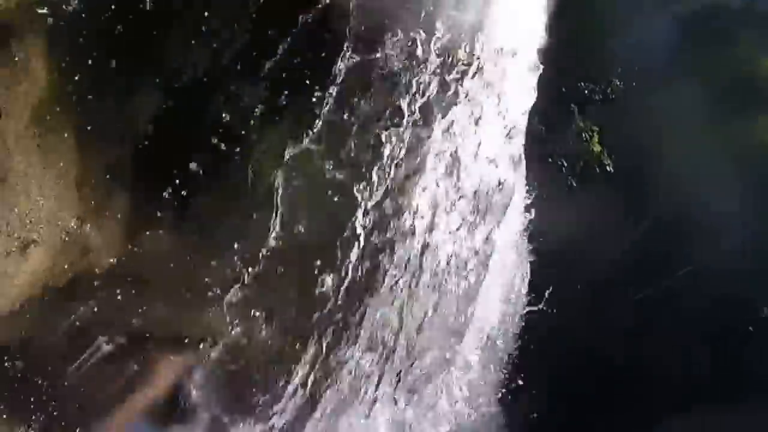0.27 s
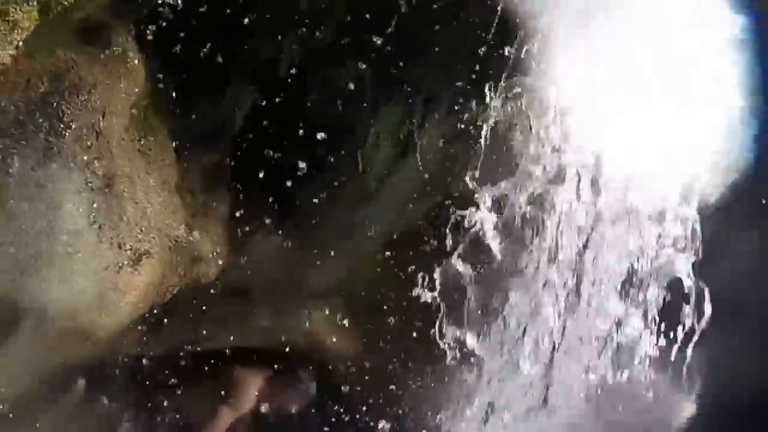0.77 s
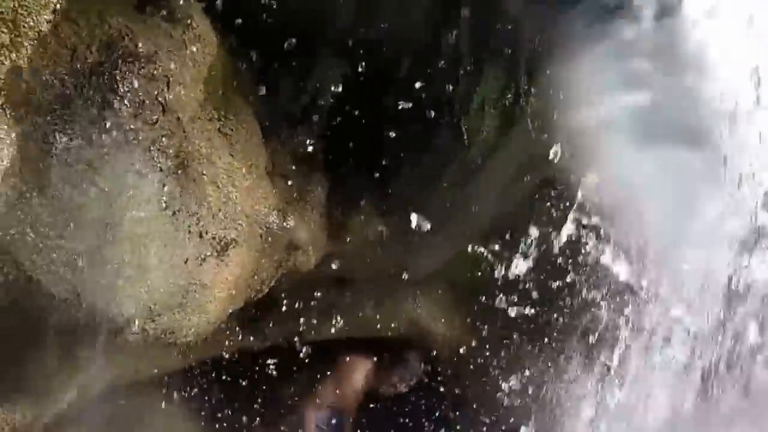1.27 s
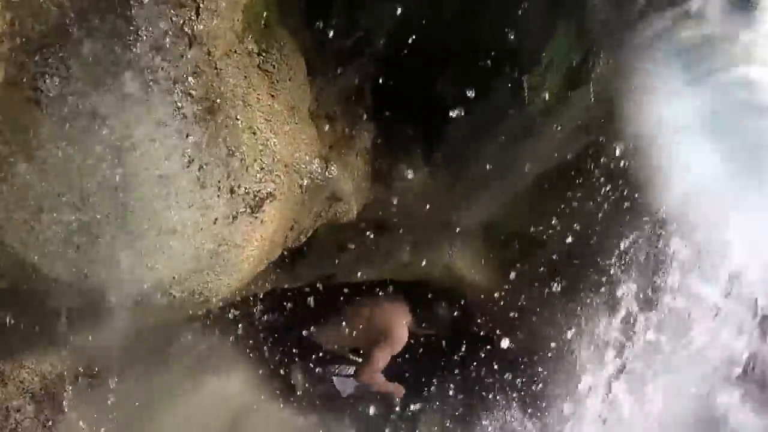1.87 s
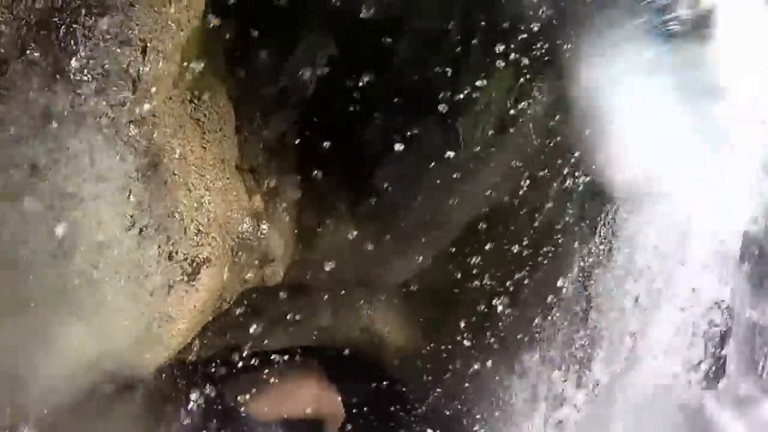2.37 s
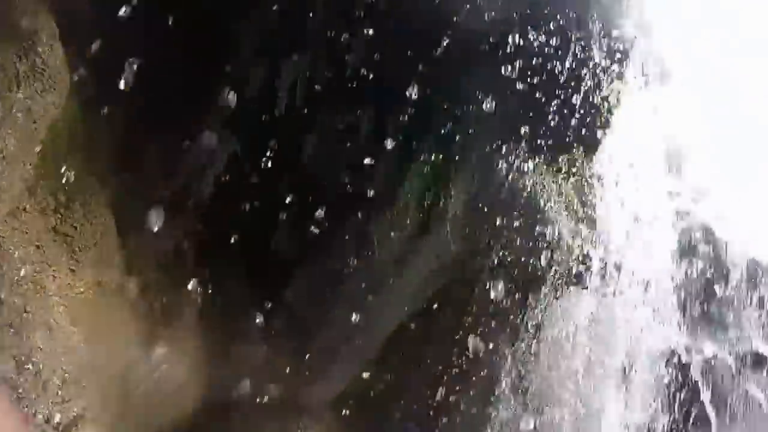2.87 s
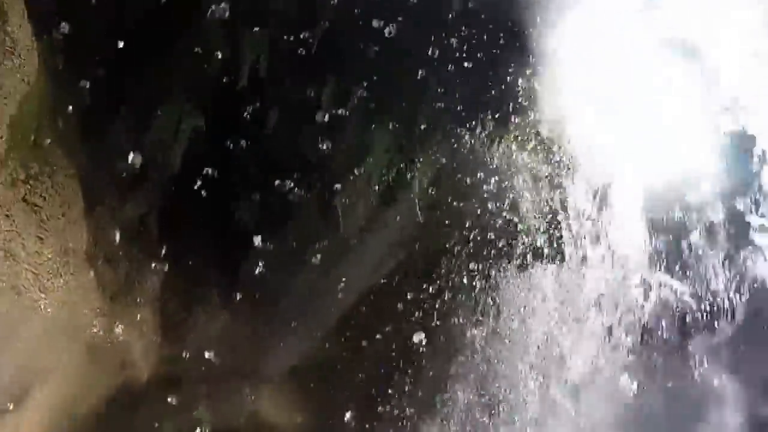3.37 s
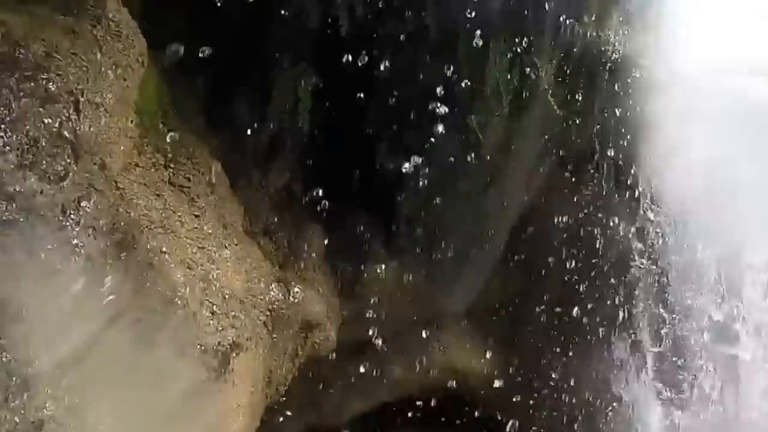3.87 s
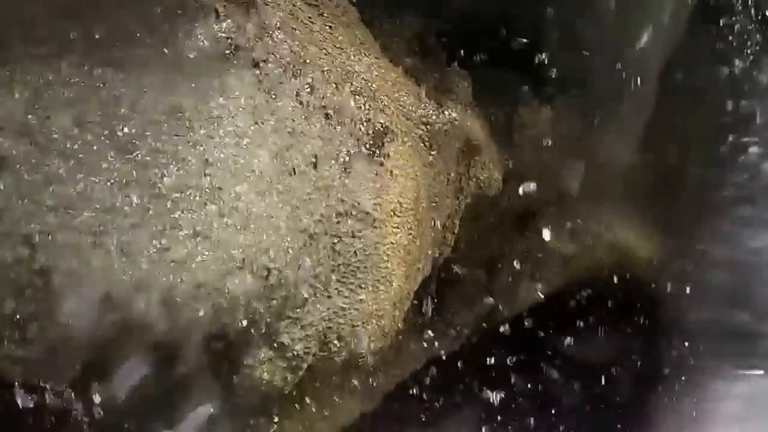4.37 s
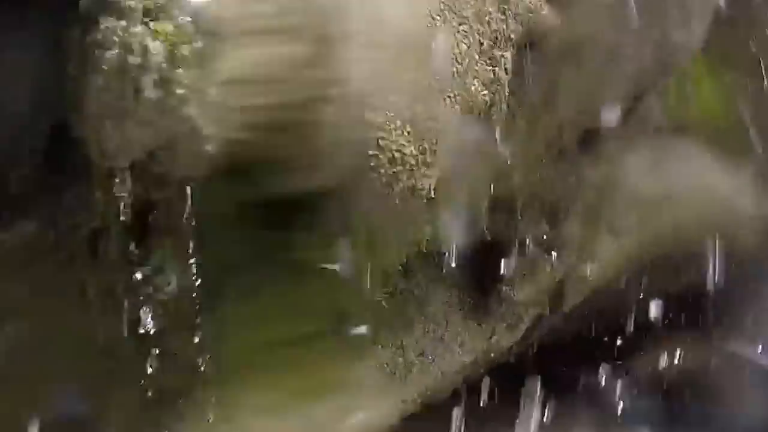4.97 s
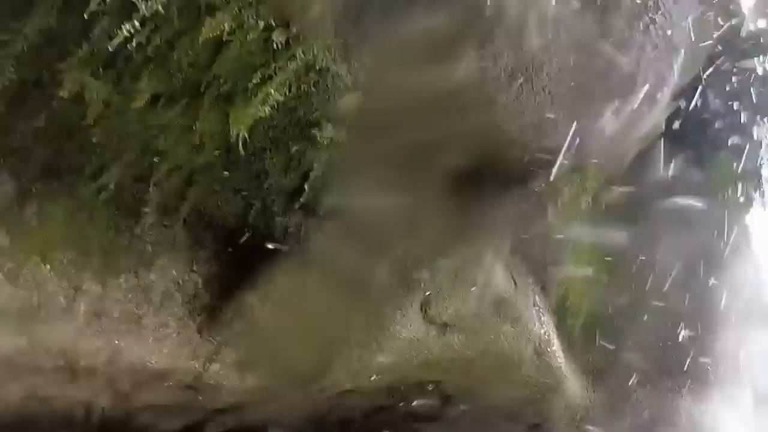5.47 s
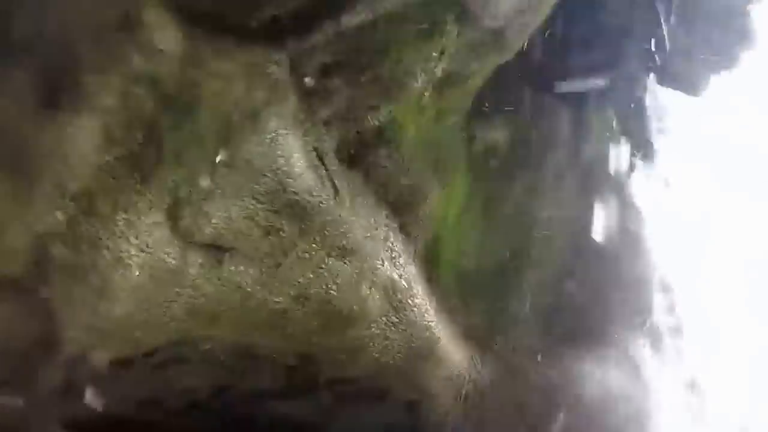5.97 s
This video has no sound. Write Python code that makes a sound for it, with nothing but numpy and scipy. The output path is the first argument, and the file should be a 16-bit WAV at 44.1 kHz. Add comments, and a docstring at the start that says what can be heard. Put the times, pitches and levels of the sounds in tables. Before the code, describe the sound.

A waterfall rushes and hisses close by while a hand bumps and knocks the wet microphone housing, then heavy drops smack it with splashes.

```python
"""A waterfall pours close by throughout, its patchy rush and fine spray made of flickering noise.
A soft bump comes first, the colour turns at 0.7 s, and a lone drop smacks the wet housing at 1 s.
From 2.5 s a cupping hand bumps and knocks the housing: damped swings, squelches and short rings.
The hand leaves at 4 s; drops smack the housing with rings, splash and low thumps; water spits at the port.
The microphone port colours everything; a limiter ducks the sound at its highest peaks."""
import sys
import numpy as np
from scipy import signal
from scipy.fft import rfft, irfft
from scipy.io import wavfile
from scipy.ndimage import uniform_filter1d, minimum_filter1d

SR = 44100
rng = np.random.default_rng(int(sys.argv[2]) if len(sys.argv) > 2 else 0)


def master(y):
    """Save y as 16-bit WAV."""
    cut = np.clip(np.atleast_2d(y).T, -1, 1)
    pcm = np.round(cut * 32767)  # scale
    wavfile.write(sys.argv[1], SR, pcm.astype(np.int16))


N = 274302
TIME = np.arange(N) / SR
EDGE_HZ = 15450  # upper band limit


def gain_of(db):
    """Decibels to amplitude."""
    return 10 ** (np.asarray(db) / 20)


def evened(x):
    """Scales to rms 1."""
    return x / np.sqrt(np.mean(x ** 2) + 1e-20)


def read(points, hz):
    """Reads a spectrum in dB, its points joined on a log-frequency axis."""
    point_hz, db = np.transpose(points)
    return np.interp(np.log(hz + 1), np.log(point_hz), db)


def levels(rows):
    """One gain curve over time for each dB column of a table."""
    s, *columns = np.transpose(rows)
    return [gain_of(np.interp(TIME, s, column)) for column in columns]


def add(mix, s, sound):
    """Mixes a sound in at time s."""
    part = mix[round(s * SR):][:len(sound)]
    part += sound[:len(part)]


def shaped(x, points):
    """Weights a sound by the given spectrum and scales it to rms 1."""
    hz = np.fft.rfftfreq(len(x), 1 / SR)
    spectrum = rfft(x) * gain_of(read(points, hz))
    return evened(irfft(spectrum, len(x)))


def noise(points, size):
    """Noise of rms 1 with the given spectrum."""
    return shaped(rng.standard_normal(size), points)


def ring(t, hz, cycles, onset):
    """A dying oscillation of peak 1; decay and onset are counted in cycles."""
    turns = hz * t
    envelope = np.exp(-turns / cycles) * (1 - np.exp(-turns / onset))
    wave = np.sin(2 * np.pi * turns) * envelope
    return wave / abs(wave).max()


def boost(x, hz, width, db):
    """A resonance rings on top of the sound, or is taken out of it where db is negative."""
    resonance = signal.lfilter(*signal.iirpeak(hz, hz / width, SR), x)
    return x + (gain_of(db) - 1) * resonance


def grains(per_s, low_hz, high_hz, cycles, spread_db, glide, count=30):
    """Many small rings at random times share a set of pitches, a few much larger than the rest."""
    t, out = np.arange(2048) / SR, np.zeros(N)
    for hz in np.geomspace(low_hz, high_hz, count):
        sizes = gain_of(spread_db * np.minimum(rng.exponential(1, N), 4))
        hits = sizes * (rng.random(N) < per_s / count / SR)
        rising_hz = hz * (1 + glide * t)  # the pitch bends upward unless glide is 0
        out += signal.oaconvolve(hits, ring(t, rising_hz, cycles, 0.3))[:N]
    return evened(out)


# relative spectrum of falling water: [pitch_hz, density_db per Hz]
RUSH_SPECTRUM = [(20, -22), (200, -0.1), (500, -1), (950, -3), (1300, 4), (2500, 5.5), (3200, 0.84),
                 (5500, -1.8), (8000, -7), (11000, -15), (13500, -13.5), (15200, -20.5)]
# strength of the fall as the microphone housing turns, before layer trims: [time_s, rush_db, spray_db]
FALL_LEVELS = [(0, -34, -44), (.65, -33.5, -42), (1.2, -33, -40.3), (2.25, -33, -41), (3.4, -32.5, -42),
               (4.15, -33, -41), (4.7, -31.5, -40), (5.15, -32.5, -40.5), (5.6, -31.5, -40.5),
               (6.2, -30.5, -38)]


def waterfall(patch_db=0.86, flicker_db=0.58, swell_db=0.34, split_hz=6500,
              rush_db=-2.5, spray_db=-0.46, fizz_db=-13):
    """Sheets of water break on rock: a patchy rush, finer spray above it and the fizz of near droplets."""
    frames, hz = N // 128 + 5, np.fft.rfftfreq(512, 1 / SR)
    real, imag, patches = rng.standard_normal((3, frames, len(hz)))
    # patches spread over time and pitch; flicker and swell move all pitches together
    patches = uniform_filter1d(patches, size=12, axis=0)
    patches = evened(uniform_filter1d(patches, size=9, axis=1))
    flicker = evened(uniform_filter1d(rng.standard_normal(frames), size=3))
    swell = evened(uniform_filter1d(rng.standard_normal(frames), size=22))
    movement_db = flicker_db * flicker + swell_db * swell
    field_db = read(RUSH_SPECTRUM, hz) + patch_db * patches + movement_db[:, None]
    field = (real + 1j * imag) * gain_of(field_db)

    def layer(share):
        """Turns a share of the moving spectrum back into sound of rms 1."""
        return evened(signal.istft((field * share).T, nperseg=512, noverlap=384)[1][:N])

    fine = 1 / (1 + (split_hz / (hz + 1)) ** 6)
    rush, spray = layer(1 - fine), layer(fine)
    fizz = grains(per_s=1400, low_hz=1430, high_hz=11840, cycles=1.9, spread_db=2.5, glide=2)
    rush_level, spray_level = levels(FALL_LEVELS)
    body = rush_level * (gain_of(rush_db) * rush + gain_of(fizz_db) * fizz)
    return body + spray_level * gain_of(spray_db) * spray


# relative spectrum of a drop bursting: [pitch_hz, density_db per Hz]
SPLASH_SPECTRUM = [(20, -2), (300, -2), (650, 14), (3000, 5.5), (6000, -0.5), (10000, 8), (16000, -47)]
SPLASH_REACH = 2.5  # splash low-pass as a multiple of the pitch: sharper blows splash brighter


def blows(rows, cycles, splash_s, tail_db, wall_db, tail_s=0.0069,
          wall_hz=600, wall_cycles=3.0, level_db=-1):
    """Each blow gives a very short ring, a burst of splash with a wet tail and a nudge to the housing wall."""
    t, out = np.arange(1500) / SR, np.zeros(N)
    wall = gain_of(wall_db) * ring(t, wall_hz, wall_cycles, onset=.2)
    fade = np.exp(-t / splash_s) + gain_of(tail_db) * np.exp(-t / tail_s)
    for s, db, hz, splash_db in rows:
        soften = signal.butter(2, min(SPLASH_REACH * hz, EDGE_HZ), fs=SR)
        burst = evened(signal.lfilter(*soften, noise(SPLASH_SPECTRUM, len(t))))
        splash = 0.34 * np.tanh(burst) * fade  # tanh rounds off the peaks
        blow = gain_of(splash_db) * splash - ring(t, hz, cycles, onset=0.054) - wall
        add(out, s, gain_of(db + level_db) * blow)
    return out


# fingers on the housing, before the trim in blows; splash_db sets the splash against the ring:
# [start_s, level_db, pitch_hz, splash_db]
FINGER_KNOCKS = [(3.0355, -17.5, 535, -12), (3.2267, -17, 700, -9), (3.464, -24, 603, 5),
                 (3.4895, -7, 1375, 10), (3.4909, 5.5, 540, -5), (3.620, -19, 1000, -1),
                 (3.7945, -15.5, 1370, -14)]


def finger_knocks():
    """Fingers knock on the housing, whose ring dies away in about a cycle."""
    return blows(FINGER_KNOCKS, cycles=1.1, splash_s=0.0011, tail_db=-12.5, wall_db=-13)


# the largest drops on the housing, before the trim in blows; splash_db sets the splash against the ring:
# [start_s, level_db, pitch_hz, splash_db]
DROP_SMACKS = [(1.000, -13.5, 2670, -10), (4.753, -10, 2330, -10), (4.9787, -9.5, 1440, 6),
               (4.988, -14, 1510, 9.5), (5.004, -4.5, 2100, 3), (5.1917, -14.5, 1690, -13),
               (5.2124, 8.5, 1470, 1.5), (5.244, -8.5, 1700, 7), (5.362, -6, 1510, -3),
               (5.3788, 6, 2660, 1.5), (5.446, -10, 1470, 3), (5.4518, -3.5, 600, 3), (5.491, -13, 1100, 4),
               (5.583, 0.5, 2070, -7), (5.6494, 3.5, 2150, 2), (5.663, -7.5, 1380, -4),
               (5.827, -16, 1380, 1), (6.1513, -5, 1360, 0.5), (6.1536, -8, 840, -4)]


def drop_smacks():
    """Large drops smack the housing, with a longer splash and less wall than the fingers."""
    return blows(DROP_SMACKS, cycles=1.06, splash_s=.0018, tail_db=-14, wall_db=-26)


# relative spectrum of a squelching water film: [pitch_hz, density_db per Hz]
SQUELCH_SPECTRUM = [(20, -9), (200, 7), (550, 0), (1000, -5.5), (1800, -14), (4000, -35), (15000, -59)]
# the strongest soft bumps of the housing, from the hand and, later, as the low thump under drops:
# [start_s, level_db, pitch_hz, squelch_db]
SOFT_BUMPS = [(.385, -28.5, 67, -57), (2.44, -10.5, 50.7, -30.5), (2.673, -18.5, 75, -52),
              (2.871, -12, 50, -50), (2.894, -15, 55, -42), (2.916, -8, 66, -46), (3.033, -14, 135, -35),
              (3.118, -13.5, 72, -48), (3.15, -12.5, 108, -50), (3.185, -7.5, 118, -27.5),
              (3.194, -7.5, 82.6, -43), (3.233, -19, 89, -23), (3.34, -11.5, 148, -49),
              (3.606, -5, 52, -26), (3.621, -19, 108, -14.5), (3.641, -6.5, 145, -16),
              (3.754, -13.5, 217, -20), (3.796, 0, 56.4, -21.5), (3.847, -11.5, 205, -25),
              (3.883, -9, 111, -21.5), (3.9, -10, 62, -43), (3.984, -21.5, 220, -21.5),
              (4.341, -27, 119, -33.5), (4.68, -27, 97, -39), (5.376, -21, 133, -33),
              (5.552, -22, 130, -26), (6.049, -20.5, 197, -31), (6.150, -15, 198, -27)]


def soft_bumps(cycles=0.41, onset=0.57, squelch_s=0.013, slips_per_s=550):
    """A push or drop gives a heavily damped swing of the housing; its water film squelches in tiny slips."""
    t, out = np.arange(6000) / SR, np.zeros(N)
    envelope = np.exp(-t / squelch_s) * (1 - np.exp(-t / 0.0004))
    for s, db, hz, squelch_db in SOFT_BUMPS:
        slipping = (rng.random(len(t)) < slips_per_s / SR) + 0.044  # slips over a faint hiss
        slips = rng.standard_normal(len(t)) * slipping
        squelch = shaped(slips, SQUELCH_SPECTRUM) * envelope
        add(out, s, gain_of(squelch_db) * squelch - gain_of(db) * ring(t, hz, cycles, onset))
    return out


# water spitting at the microphone port: [start_s, level_db, centre_hz]
PORT_SPITS = [(4.9902, -24, 14100), (4.9975, -16, 9000), (5.0035, -17.5, 11900), (5.379, -22, 11600),
              (5.5525, -11.5, 8000)]


def port_spits(swell_s=0.0006, width=0.57, order=2):
    """Air and water squeeze through the port in a brief, high hiss that swells and fades."""
    t, out = np.arange(1000) / SR, np.zeros(N)
    swell = (t / swell_s) ** 2 * np.exp(2 * (1 - t / swell_s))
    for s, db, hz in PORT_SPITS:
        band = signal.iirpeak(hz, 1 / width, SR)  # width is a fraction of the centre
        hiss = rng.standard_normal(len(t))
        for _ in range(order):
            hiss = signal.lfilter(*band, hiss)
        add(out, s, gain_of(db) * swell * evened(hiss))
    return out


# how much water lands on the housing, before layer trims: [time_s, level_db]
WATER_LANDING = [(0, -19), (2.05, -16.5), (2.25, -6.5), (3.2, -1.5), (3.95, 0), (4.35, -8.5), (4.72, 1),
                 (5.17, 7.5), (5.4, 1), (6.22, 2)]
GURGLE_GROWTH = 0.6  # dB of bubbling for each dB of water landing


def wet_housing(gurgle_db=-44, patter_db=-42, drops_db=-47):
    """Water lands on the housing and runs off: small bubbles, a fine patter and a few larger drops."""
    wet, = levels(WATER_LANDING)
    gurgle = grains(per_s=390, low_hz=446, high_hz=1026, cycles=3.9, spread_db=5.0, glide=10.3)
    patter = grains(per_s=420, low_hz=1037, high_hz=3020, cycles=0.92, spread_db=4.0, glide=1)
    drops = grains(per_s=23, low_hz=930, high_hz=3280, cycles=0.59, spread_db=3.5, glide=0)
    landing = gain_of(patter_db) * patter + gain_of(drops_db) * drops
    return gain_of(gurgle_db) * wet ** GURGLE_GROWTH * gurgle + wet * landing


# relative spectrum of the buffeted housing: [pitch_hz, density_db per Hz]
RUMBLE_SPECTRUM = [(5, -35), (15, 15), (35, 7), (90, -8), (150, -17.5), (230, -24), (330, -24), (800, -69),
                   (4000, -80)]
# how hard hand and water buffet the housing, before layer trims: [time_s, level_db]
BUFFET_LEVELS = [(0, -43.5), (.42, -40.5), (.65, -52), (2.2, -45.5), (2.5, -33), (2.75, -28.5), (2.9, -24),
                 (3.2, -23), (3.33, -32.5), (3.55, -24.5), (3.92, -26), (4.12, -31), (4.7, -39.5),
                 (5.85, -42.5), (6.22, -36)]


def buffeting(rumble_db=-1, nudges_db=-8, scrape_db=-20):
    """A low rumble, with many small nudges and the crackly scrape of the shifting grip."""
    strength, = levels(BUFFET_LEVELS)
    rumble = gain_of(rumble_db) * noise(RUMBLE_SPECTRUM, N)
    nudges = grains(per_s=60, low_hz=53.4, high_hz=198, cycles=0.45, spread_db=2.0, glide=0)
    scrape = grains(per_s=83, low_hz=323, high_hz=1290, cycles=1.1, spread_db=4, glide=0)
    return strength * (rumble + gain_of(nudges_db) * nudges + gain_of(scrape_db) * scrape)


# peaks and dips of each surrounding hollow: [centre_hz, width_hz, boost_db]
# facing the fall
FALL_COLOUR = [(2600, 78, 4), (3230, 100, 2), (5170, 350, -5), (5520, 250, 7)]
# facing the rock
ROCK_COLOUR = [(2850, 350, -2), (5360, 180, -4.5), (6830, 400, -3.5)]
# in the hollow of the hand
HAND_COLOUR = [(221, 58, 4.5), (1780, 200, 6), (2830, 350, 0.5), (3820, 490, 4.5)]
# under the overhang
OVERHANG_COLOUR = [(2350, 680, 1.65), (3150, 150, 2.5), (4960, 190, 2)]
TURN_AWAY_S, HAND_ON_S, HAND_OFF_S = 0.69, 2.52, 4.03  # middle of each change
CHANGE_S = 0.19  # one colour fades into the next


def surroundings(sound):
    """The space around the microphone adds its resonances, one hollow giving way to the next."""
    turned, cupped, released = (np.clip((TIME - s) / CHANGE_S + .5, 0, 1)
                                for s in (TURN_AWAY_S, HAND_ON_S, HAND_OFF_S))
    hollows = ((FALL_COLOUR, 1 - turned), (ROCK_COLOUR, turned - cupped),
               (HAND_COLOUR, cupped - released), (OVERHANG_COLOUR, released))
    for hollow, present in hollows:
        for hz, width, db in hollow:
            sound = boost(sound, hz, width, db * present)
    return sound


def scene():
    """Everything reaches one microphone, so both channels are alike."""
    struck = finger_knocks() + drop_smacks() + soft_bumps()
    water = waterfall() + port_spits() + wet_housing()
    sound = surroundings(water + struck + buffeting())
    return np.array([sound, sound])


# resonances of the microphone port and of the housing: [centre_hz, width_hz, boost_db]
PORT_RESONANCES = [(1281, 128, 4.5), (1790, 250, 4), (2472, 235, 5), (3755, 200, 4.0), (4682, 510, 8.5),
                   (6130, 920, 4), (7330, 1100, 3), (9700, 1100, 3), (12220, 3170, 1)]


def record(dry, ceiling_db=-0.1, recovery_db_per_s=12.5):
    """Port resonances, a peak limiter that falls at once and recovers slowly, then the band limit."""
    x = dry.mean(0)
    for hz, width, db in PORT_RESONANCES:
        x = boost(x, hz, width, db)
    over_db = np.maximum(20 * np.log10(abs(x) + 1e-9) - ceiling_db, 0)
    # hold the deepest duck so far, less what has recovered since
    recovered_db = recovery_db_per_s * TIME
    duck_db = np.maximum.accumulate(over_db + recovered_db) - recovered_db
    # widen and smooth the duck over a few milliseconds
    smooth_db = uniform_filter1d(minimum_filter1d(-duck_db, size=129), size=129)
    x = x * gain_of(smooth_db)
    low_pass = signal.firwin(511, EDGE_HZ, window=("kaiser", 9), fs=SR)
    x = signal.oaconvolve(x, low_pass, "same")
    return np.array([x, x])


dry = scene()
out = record(dry)
master(out)
```